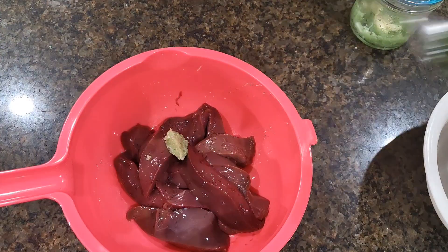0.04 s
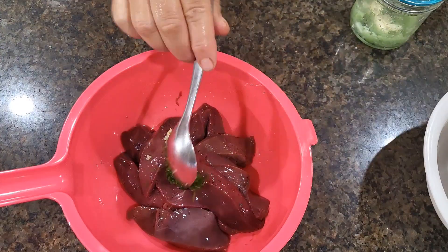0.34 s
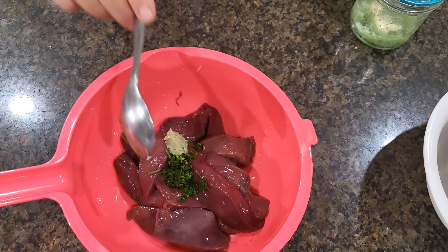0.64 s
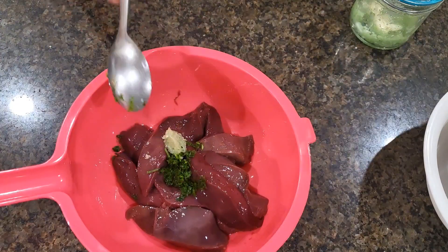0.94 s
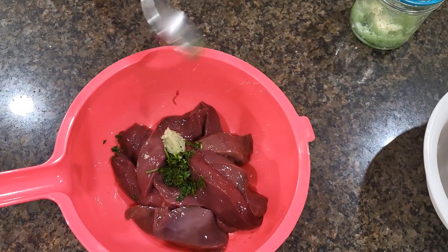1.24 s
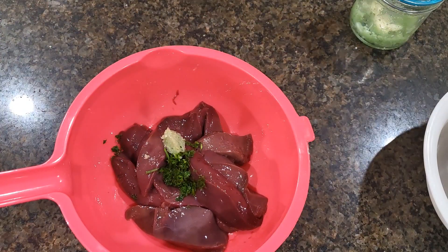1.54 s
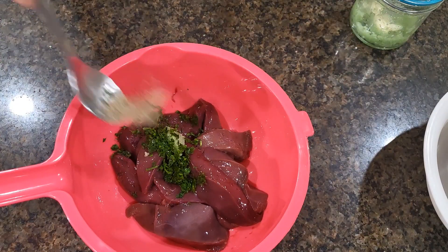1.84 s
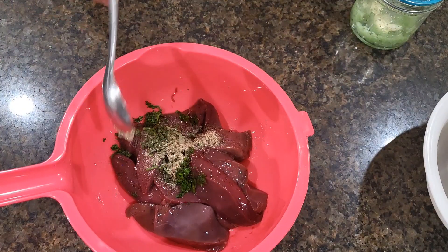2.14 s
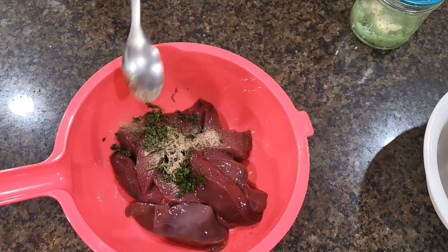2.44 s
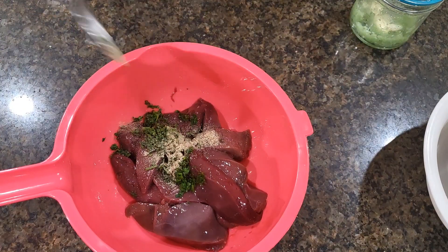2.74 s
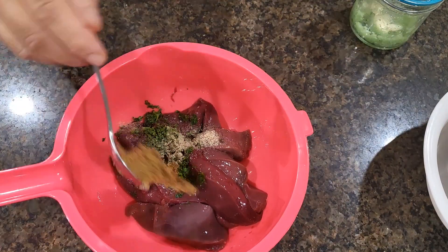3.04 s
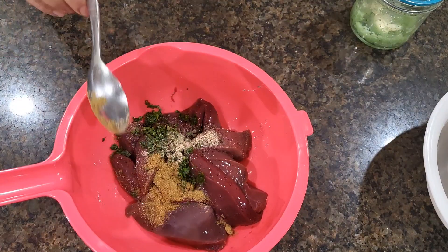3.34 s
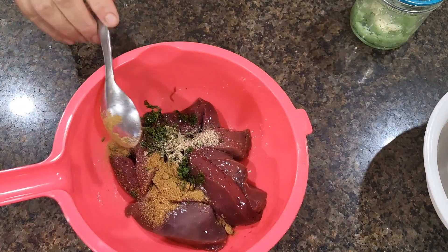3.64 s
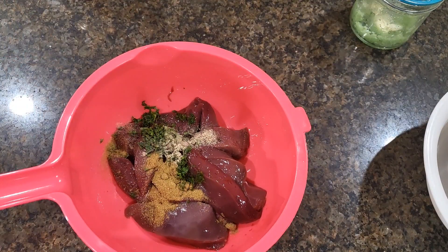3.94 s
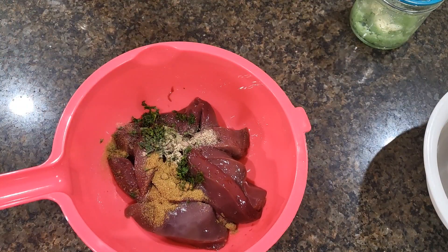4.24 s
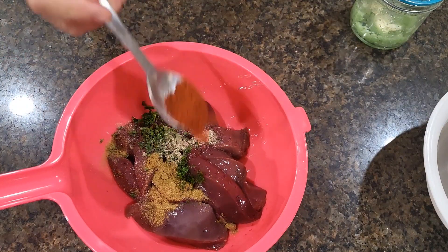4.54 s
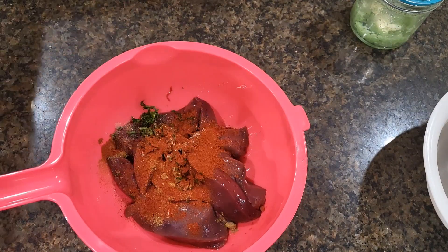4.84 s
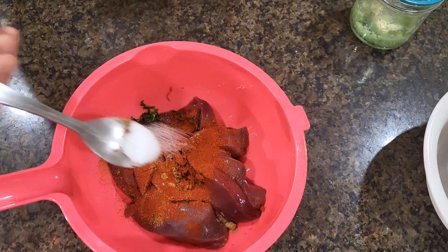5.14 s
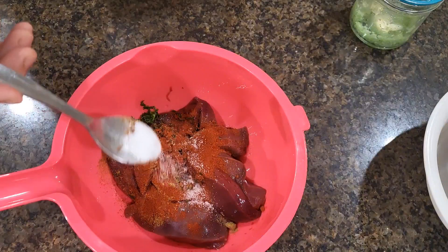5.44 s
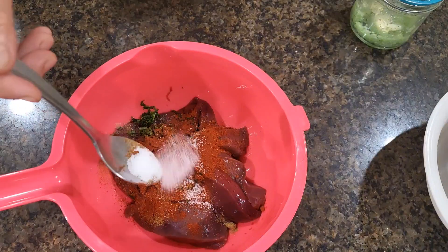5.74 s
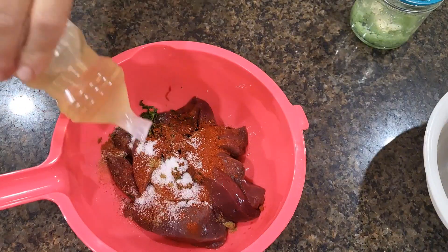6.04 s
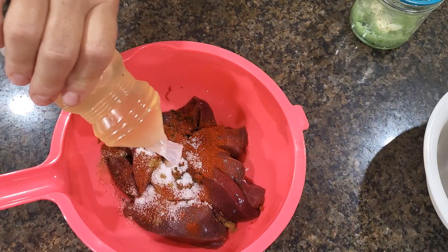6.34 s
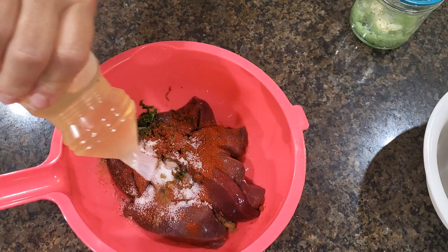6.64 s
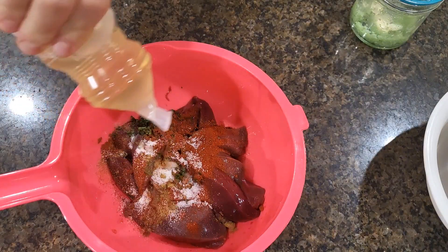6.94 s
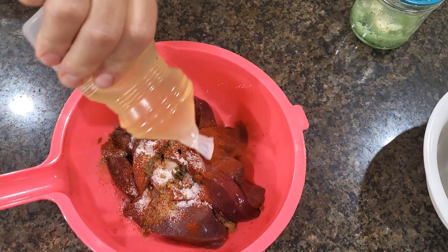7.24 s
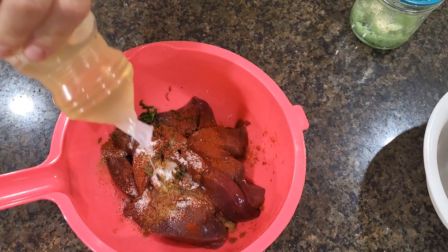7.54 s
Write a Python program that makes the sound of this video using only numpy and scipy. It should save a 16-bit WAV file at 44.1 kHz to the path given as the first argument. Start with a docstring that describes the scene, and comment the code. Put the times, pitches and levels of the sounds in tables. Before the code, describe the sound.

Three sharp double knocks of a spoon on a plastic bowl's rim, followed by soft, wet fizzing from a squeeze bottle in a humming kitchen.

```python
"""An appliance hums in a small kitchen from start to end. After a faint rub, a steel spoon knocks
spice off on the rim of a plastic colander: three double knocks, some with small bounces. Each makes
the bowl clack and ring, the stone counter thud and the room echo; after each pair the ring is cut short.
Near 5 seconds the faint tail of a knock starts abruptly and fades; near 6 come a sudden soft hiss, rub
and click. Then a squeeze bottle sputters over meat: air and liquid froth out and tiny bubbles burst."""
import sys
import numpy as np
from scipy import signal
from scipy.fft import rfft, irfft, next_fast_len
from scipy.io import wavfile
from scipy.ndimage import uniform_filter1d, minimum_filter1d, map_coordinates

SR = 44100
rng = np.random.default_rng(int(sys.argv[2]) if len(sys.argv) > 2 else 0)


def persist_wave(psi):
    """Save psi, clipped to +-1, as 16-bit WAV."""
    counts = np.round(np.clip(psi, -1, 1) * 32767).astype(np.int16)
    wavfile.write(sys.argv[1], SR, np.atleast_2d(counts).T)


N = 343513
TIME = np.arange(N) / SR


def amp(db):
    """Turn decibels (dB) into a number to multiply a sound by."""
    return 10 ** (np.asarray(db) / 20)


def unit(x):
    """Scale a sound to an average strength (rms) of 1."""
    return x / np.sqrt(np.mean(x ** 2) + 1e-20)


def along(table, hz, column=1):
    """Read a table at any frequency, sliding smoothly between its rows."""
    columns = np.transpose(table)
    return np.interp(np.log(hz + 1), np.log(columns[0] + 1), columns[column])


def pan(db):
    """Two gains that make the left side db louder than the right."""
    return amp(np.array([np.atleast_1d(db), -np.atleast_1d(db)]) / 2)


def wobble(rate):
    """A smooth curve through `rate` random values a second."""
    coarse = TIME[::64]
    values = rng.standard_normal(int(N * rate / SR) + 4)
    return np.interp(TIME, coarse, map_coordinates(values, [coarse * rate]))


def filtered(x, response):
    """Filter a sound; response(f) says what happens to each frequency."""
    size = next_fast_len(x.shape[-1] + SR // 8, True)
    return irfft(rfft(x, size) * response(np.fft.rfftfreq(size, 1 / SR)), size)[..., :x.shape[-1]]


def resonance(f, hz, width):
    """A filter that passes hz fully and weakens the frequencies on either side."""
    return 1j * f * width / (hz * hz - f * f + 1j * f * width)


def causal(gain):
    """A filter with these gains that never sounds before it is struck (minimum phase)."""
    cepstrum = irfft(np.log(gain))
    half = len(cepstrum) // 2
    return np.exp(rfft(np.r_[cepstrum[0], 2 * cepstrum[1:half], np.zeros(half)]))


def stereo_noise(size, likeness):
    """Left and right noise. Each likeness row: frequency in Hz, how alike the sides are."""
    def blend(f):
        angle = np.arccos(np.clip(along(likeness, f), -1, 1)) / 2
        return np.array([np.cos(angle), np.sin(angle)])
    mid, side = filtered(rng.standard_normal((2, size)), blend)
    return np.array([mid + side, mid - side])


def add(track, start, sound):
    """Mix a sound into a track at a start time in seconds."""
    part = track[:, round(start * SR):][:, :sound.shape[-1]]
    part += sound[..., :part.shape[-1]]


def fading_tones(table, t, attack_s, scatter_db):
    """Tones whose strengths vary from blow to blow. A fade time is how long a 60 dB drop takes."""
    hz, db, fade_s = np.transpose(table)[:, :, None]
    phase = rng.uniform(0, 2 * np.pi, hz.shape) + rng.normal(0, 0.37, (2,) + hz.shape)
    strength = amp(db + rng.normal(0, scatter_db, hz.shape) - 60 * t / fade_s)
    tones = strength * np.sin(2 * np.pi * hz * t + phase)
    return tones.sum(axis=1) * (1 - np.exp(-t / attack_s))


# The motor's tones. Each row: pitch in Hz, level in dB.
MOTOR_TONES = [(59, -68), (475.5, -67)]
# The tone colour of the rushing air. Each row: frequency in Hz, relative level in dB.
AIR_COLOUR = [(13, -69.5), (22, -34.5), (44, -12.5), (80, -12), (136, -7), (242, -11.5), (278, -20),
              (356, -16.5), (444, -19), (482, -18.5), (636, -24.5), (961, -29), (2740, -45.5),
              (9740, -42.5), (16000, -50.5)]
# Where the air is heard. Each row: frequency in Hz, lean to the left in dB.
AIR_LEAN = [(60, 11), (110, 13), (200, 8), (380, 12.5), (700, 13), (1290, 10.5), (2380, 4), (4400, 2.5),
            (8120, -1.5), (15000, 3)]
# How alike the air is left and right. Each row: frequency in Hz, likeness from -1 (opposite) to 1 (same).
AIR_LIKENESS = [(60, 0.54), (130, -0.15), (290, 0.82), (640, 0.84), (1410, -0.06), (3100, -0.19),
                (6820, -0.71), (15000, 1)]
def appliance():
    """A motor hums on the left, with a throbbing drone and a soft rush of air."""
    air = unit(filtered(stereo_noise(N, AIR_LIKENESS), lambda f: amp(along(AIR_COLOUR, f))))
    air = filtered(air, lambda f: pan(along(AIR_LEAN, f)))
    drone = unit(filtered(rng.standard_normal(N), lambda f: resonance(f, hz=132, width=54) ** 2))
    hum = sum(amp(db + 2.3 * wobble(9)) * np.sin(2 * np.pi * hz * TIME + .5 * wobble(10))
              for hz, db in MOTOR_TONES)
    return air * amp(-62) + drone * amp(-60) * pan(13) + hum * pan(16)


# A rub, a knock's tail, then a hiss, rub and click. Each row: start in seconds, level in dB,
# middle frequency in Hz, rise time in seconds, fade time in seconds.
FAINT_NOISES = [(.63, -77.5, 1880, .02, 0.6), (4.87, -66.5, 3240, 0.032, 0.39),
                (4.869, -71, 1200, .02, 0.37), (4.872, -76, 8000, .01, .35), (5.851, -69, 9600, .004, 0.35),
                (5.959, -65.5, 1900, 0.1164, 0.38), (6.082, -65, 4060, 0.004, 0.2),
                (6.087, -71, 6780, .004, 0.1)]
def faint_noises():
    """Broad bands of quiet noise swell and fade."""
    out, t = np.zeros((2, N)), np.arange(SR // 2) / SR
    for start, db, hz, rise_s, fade_s in FAINT_NOISES:
        def band(f):
            return resonance(f, hz, 0.46 * hz) * resonance(f, hz, 1.9 * hz) / (1 + (f / (2.4 * hz)) ** 4)
        noise = unit(filtered(rng.standard_normal((2, len(t))), band))
        loudness = np.minimum(t / rise_s, 1) * amp(db - 60 * np.maximum(t - rise_s, 0) / fade_s)
        add(out, start, noise * loudness * pan(8.2))
    return out


# The colander's short-lived overtones. Each row: pitch in Hz, width in Hz, relative level in dB.
OVERTONES = [(317, 140, -13), (1310, 280, -1.5), (1856, 170, -5), (2550, 320, -10), (2926, 280, -6),
             (3590, 87, -14), (4450, 210, -21.5)]
def colander(f, bowl_hz, overtone_db):
    """The struck bowl's frequencies: one main note, plus overtones that vary a little each time."""
    overtones = sum(amp(db + rng.normal(0, 1)) * resonance(f, hz * (1 + rng.normal(0, 0.03)), width)
                    for hz, width, db in OVERTONES)
    body = resonance(f, bowl_hz, width=250) + amp(overtone_db) * overtones
    body = body / (1 + 1j * f / 4500)  # soft plastic passes little treble
    return body * 1j * f / (1j * f + 120)  # thin out the bass


# Where the clack is heard. Each row: frequency in Hz, lean to the left in dB.
CLACK_LEAN = [(300, 4), (750, 2.5), (1150, 6), (1400, 5), (1950, 8), (3000, 0), (5000, 7), (9000, 6)]
def direct_clack(blow, f, left_db):
    """The clack travels straight to the listener, reaching the right side a little later."""
    upward = blow * (1j * f / (1j * f + 110)) ** 2  # the open bowl sends little bass upward
    delay = np.array([np.ones_like(f), np.exp(-2j * np.pi * f * .00007)])
    sides = np.array([causal(gain) for gain in pan(along(CLACK_LEAN, f) + left_db)])
    return irfft(upward * delay * sides)


# The spoon's blows and bounces. Each row: start in seconds, relative level in dB, bowl pitch in Hz,
# then boosts in dB for the overtones, the crack, the thud, the echo and ring, and the lean to the left.
BLOWS = [(0.7986, 1, 710, -1, -4.5, -5, -1, 3.5), (.8490, -7.5, 740, -7, -5.5, -3.5, -3.5, -0.5),
         (1.0243, 1, 741, -2.5, -2.5, -2, -2, 0.5), (1.0829, -21.5, 739, -1, -2.5, -3, -4, 0.5),
         (1.239, -48, 740, 1, 10.5, -5, 3.5, -2), (1.281, -46.5, 695, -1.5, 2.5, 16, 6, 1),
         (2.3720, -6.5, 612, 2.5, 9.5, -7.5, 2.5, 2.5), (2.5877, -1.5, 667, 2.5, 3, -6.5, -2.5, 0),
         (2.6123, -6, 483, -17.5, -18.5, -3, -8.5, 1), (3.4567, -2, 785, -3, 1.5, 2, 0, 2.5),
         (3.6504, 4.5, 789.4, -5, -6.5, -5, -4.5, 0)]
# The crack of steel on plastic. Each row: frequency in Hz, relative level in dB.
CRACK_COLOUR = [(300, -39), (1500, -26), (2400, -24.5), (3200, -15.5), (5000, -21.5), (7000, -24),
                (10000, -29), (13000, -40), (16000, -43.5)]
# Tones that linger after a knock. Each row: pitch in Hz, relative level in dB, fade time in seconds.
RING_TONES = [(429, -7, 0.15), (511, -3.5, .28), (670, -2.5, 0.13), (740, -3, 0.073), (788, 3.5, 0.14),
              (880, 3, .26), (1260, -10, .3), (1400, -8.5, 0.13), (1495, -13.5, .27), (1956, -10, 0.3),
              (2044, -13, .26), (2850, -11.5, .24), (3110, -12, 0.17)]
# The counter under the bowl. Each row: pitch in Hz, relative level in dB, fade time in seconds.
COUNTER_TONES = [(60, -3.5, 0.5), (133, -2, .5), (155.3, -1, .35)]
# Times in seconds when any knock still sounding is cut short.
CUTOFFS = [1.745, 2.86, 3.762]
def spoon_knocks(size=24576):
    """Steel hits the plastic rim: a clack, the room's echo, lingering tones and a thud of the counter."""
    out, t, f = np.zeros((2, N)), np.arange(size) / SR, np.fft.rfftfreq(size, 1 / SR)
    crack_shape = causal(amp(along(CRACK_COLOUR, f)))
    for start, db, bowl_hz, overtone_db, crack_db, thud_db, room_db, left_db in BLOWS:
        body = colander(f, bowl_hz, overtone_db)
        crack = amp(crack_db) * crack_shape
        # the steel chatters on the rim for a few milliseconds
        chatter = rfft(rng.standard_normal((2, size)) * amp(-17 - 60 * t / .014))
        clack = direct_clack(amp(db + 27.5) * (body + crack * (0.26 + chatter)), f, left_db)
        # the room hears the chatter from all sides, which evens out its colour
        spread = amp(db + 26.5) * (body + crack * 0.81)
        echo = irfft(spread * rfft(kitchen_echo(size))) * amp(room_db - 8)
        ring = fading_tones(RING_TONES, t, attack_s=0.00099, scatter_db=0.4) * amp(db + room_db - 28)
        thud = fading_tones(COUNTER_TONES, t, attack_s=.012, scatter_db=1) * amp(db + thud_db - 33.5)
        next_cutoff = min(cutoff for cutoff in CUTOFFS if cutoff > start)
        length_s = min(next_cutoff - start, .5)
        ending = np.clip((length_s - t) / .002, 0, 1)
        add(out, start, (clack + echo + ring * pan(5.9) + thud * pan(8)) * ending)
    return out


# The kitchen's echo. Each row: frequency in Hz, relative level in dB, fade time in seconds,
# lean to the left in dB.
ECHO_BANDS = [(60, 9, .6, 6.5), (130, 6, 0.44, 6.5), (260, 1, 0.34, 5.5), (501, 0, 0.34, 6.5),
              (870, 3, 0.36, 7), (1230, -4, 0.4, 6.5), (1960, 2, 0.41, 6), (3000, 0, .34, 6),
              (4900, -3.5, 0.4, 5), (9050, -5, 0.4, 2), (15000, -1, 0.28, 4.5)]
def kitchen_echo(size, delay_s=.0078, early_db=5, early_s=0.0073):
    """Silence until the nearest cupboard answers, then strong early echoes and a smooth tail."""
    noise = stereo_noise(size, likeness=[(150, .92), (500, 0.46), (1200, 0.13), (4000, .1)])
    hz, age, bands = signal.stft(noise, SR, nperseg=256)
    db, fade_s, left_db = (along(ECHO_BANDS, hz, column)[:, None] for column in (1, 2, 3))
    bands = bands * amp(db - 60 * age / fade_s) * pan(left_db)
    tail = signal.istft(bands, SR, nperseg=256)[1][:, :size]
    early_boost = amp(early_db * np.exp(-TIME[:size] / early_s))
    delayed = np.pad(tail * early_boost, ((0, 0), (round(delay_s * SR), 0)))
    return delayed[:, :size] / np.sqrt(SR / 100)


# The bottle's high fizz. Each row: frequency in Hz, relative level in dB.
FIZZ_COLOUR = [(4500, -34), (8000, -6), (10500, 0), (13000, 1), (15000, 1.5), (16000, -2.5)]
# Its lower, wet spit. Each row: frequency in Hz, relative level in dB.
SPIT_COLOUR = [(2000, -31), (3800, -13.5), (5200, -2.5), (7500, -0.5), (10000, -12.5)]
def squeeze_bottle(start=6.27):
    """Air and liquid sputter from the nozzle and land on the meat."""
    out, now = np.zeros((2, N)), TIME[TIME >= start]
    size, elapsed = len(now), now - start
    fizz_gain, spit_gain = nozzle_flow(now, elapsed)
    fizz = froth(size, FIZZ_COLOUR, patchy_db=2) * fizz_gain * amp(1.5 * wobble(60)[:size])
    spit = froth(size, SPIT_COLOUR, patchy_db=2.5) * spit_gain * amp(2.4 * wobble(45)[:size])
    # liquid lands with a soft wash that grows as it pools
    wash = unit(filtered(rng.standard_normal((2, size)), lambda f: resonance(f, 1040, 1740) ** 2))
    add(out, start, fizz + spit + wash * amp(-87.5 + 8.5 * elapsed))
    return (out + bubble_pops(now, fizz_gain)) * pan(8)


def froth(size, colour, patchy_db, clicks_per_s=1600):
    """Tiny clicks crowd on a hiss; the bubbles' pitches shift from moment to moment."""
    clicks = (rng.random(size) < clicks_per_s / SR) * rng.standard_normal(size)
    clicks = clicks * (1 + .5 * rng.standard_normal((2, size)))  # uneven between left and right
    hiss = 0.81 * rng.standard_normal((2, size))
    hz, _, bands = signal.stft(unit(clicks) + hiss, SR, nperseg=256)
    patches = uniform_filter1d(rng.standard_normal(bands.shape[1:]), size=7, axis=0)  # blur in pitch
    patches = unit(uniform_filter1d(patches, size=8, axis=1))  # blur in time
    bands = bands * amp(along(colour, hz)[:, None] + patchy_db * patches)
    return unit(signal.istft(bands, SR, nperseg=256)[1][:, :size])


# Squeezes of the bottle. Each row: start in seconds, hold in seconds, fizz level in dB, spit level in dB.
BOTTLE_SQUEEZES = [(6.48, .016, -65, -66.5), (6.603, 0.013, -78.5, -76), (6.877, .15, -64, -71),
                   (7.405, 0.069, -62, -68), (7.645, .075, -62, -65.5), (7.78, .02, -60, -63.5)]
def nozzle_flow(now, elapsed):
    """How strong fizz and spit are: a dribble that grows steadily, plus squeezes that each end in a spit."""
    fizz = amp(-81 + 7 * elapsed)  # the nozzle froths ever more as it gets wet
    spit = fizz * amp(-9)
    swell, relax = 130, 172  # the fizz before and after the hold, in dB a second
    onset, build, fall = 356, 69, 300  # the spit before, during and after it, in dB a second
    for start, hold, fizz_db, spit_db in BOTTLE_SQUEEZES:
        before, after = np.maximum(start - now, 0), np.maximum(now - start - hold, 0)
        remaining = np.clip(start + hold - now, 0, hold)
        fizz = np.hypot(fizz, amp(fizz_db - swell * before - relax * after))
        spit = np.hypot(spit, amp(spit_db - onset * before - build * remaining - fall * after))
    return fizz, spit


# The loudest bubbles. Each row: start in seconds, peak level in dB, pitch in Hz.
LOUD_POPS = [(6.2798, -56, 8460), (6.3597, -54, 8600), (6.3929, -52, 10160), (6.4316, -53.5, 11200),
             (6.7105, -51, 10000), (6.8837, -42.5, 14670), (6.9632, -46, 12970), (7.0015, -43, 14600),
             (7.35, -47, 14340), (7.6154, -44.5, 14490), (7.7756, -42, 10590)]
def bubble_pops(now, fizz_gain, small_per_s=14):
    """Single bubbles burst: loud ones at set times, small random ones that follow the fizz's level."""
    out, t, small_pops = np.zeros((2, N)), np.arange(SR // 16) / SR, []
    for when, pitch in rng.random((int(small_per_s * len(now) / SR), 2)):
        i = int(when * len(now))
        small_pops.append((now[i], 20 * np.log10(fizz_gain[i]) + 10.5, 13500 * 1.3 ** (pitch - .5)))
    fade = amp(-60 * t / 0.019) + amp(-22 - 60 * t / .15)  # a quick snap and a faint tail
    for start, db, hz in LOUD_POPS + small_pops:
        burst = rng.standard_normal((2, len(t))) * fade
        pop = filtered(burst, lambda f: resonance(f, hz, 0.29 * hz) ** 2)
        add(out, start, pop / np.abs(pop).max() * amp(db))
    return out


def scene():
    """Everything that sounds at the counter, added together."""
    return spoon_knocks() + appliance() + faint_noises() + squeeze_bottle()


def record(dry, low_hz=20, top_hz=16000):
    """A fast limiter turns down the sharpest peaks; a filter drops deep rumble and the highest treble."""
    needed = np.minimum(1, 1 / (np.abs(dry).max(axis=0) + 1e-9))
    gain = uniform_filter1d(minimum_filter1d(needed, size=45), size=45)
    return filtered(dry * gain, lambda f: (f < top_hz) * 1j * f / (1j * f + low_hz))


dry = scene()
out = record(dry)
persist_wave(out)
```